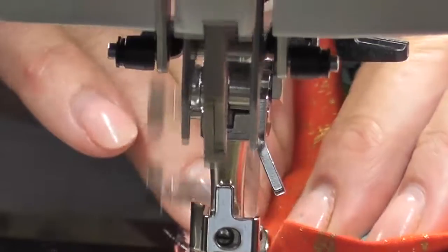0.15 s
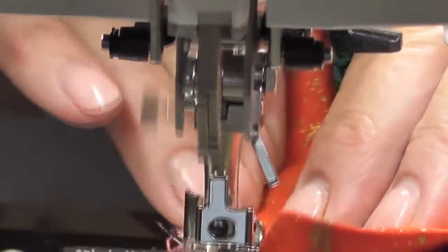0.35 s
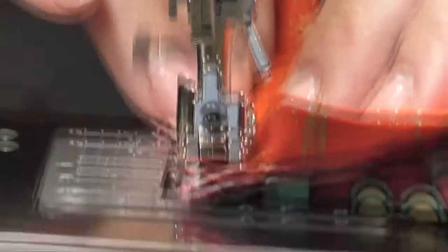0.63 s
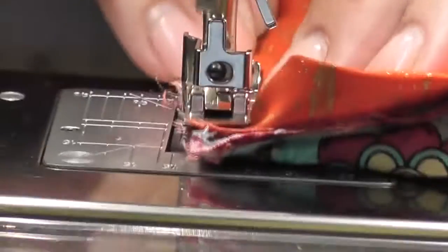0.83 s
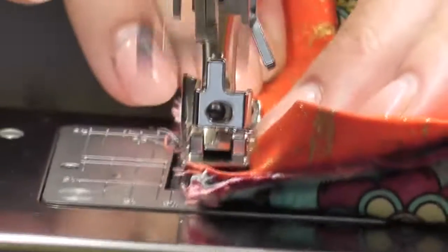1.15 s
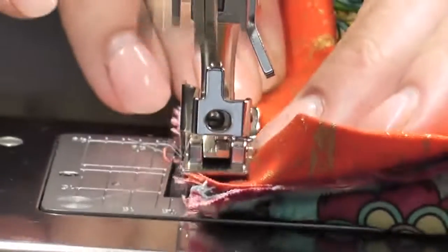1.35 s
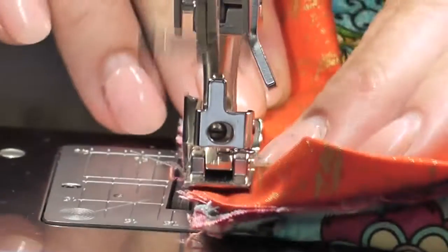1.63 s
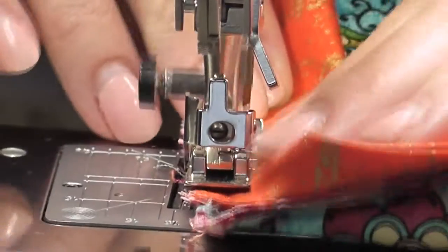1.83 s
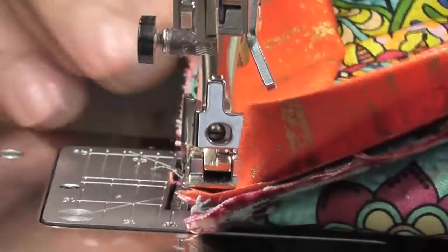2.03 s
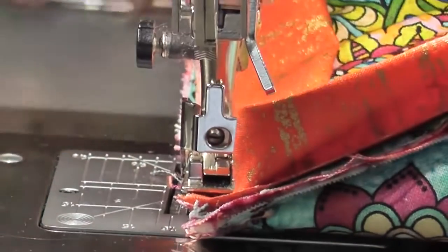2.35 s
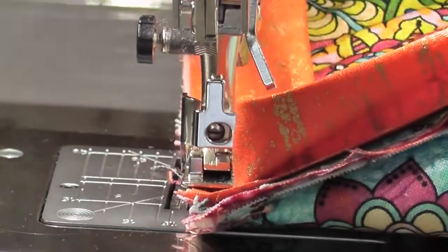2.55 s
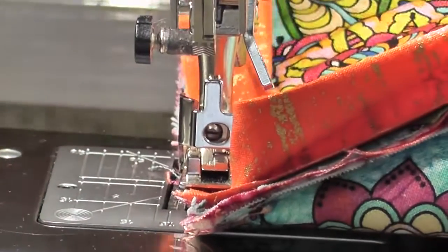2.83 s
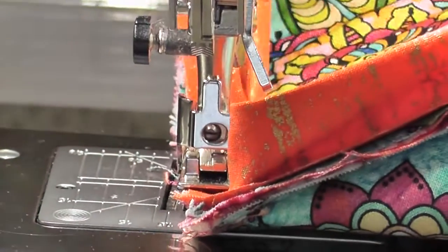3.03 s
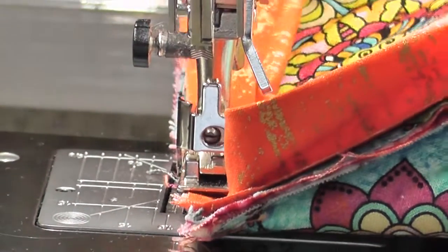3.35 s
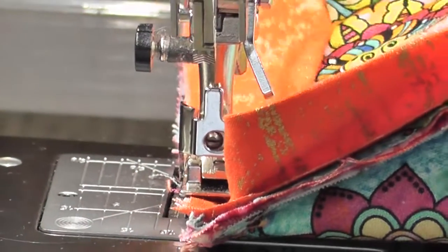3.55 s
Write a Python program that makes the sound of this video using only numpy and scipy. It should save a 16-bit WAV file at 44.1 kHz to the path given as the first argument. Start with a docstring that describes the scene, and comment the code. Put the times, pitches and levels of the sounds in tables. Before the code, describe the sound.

Close stereo microphones in a small quiet room catch a sewing machine's rattling whir and quick stitching clatter, cut off by a thump, then soft cloth rubbing, tiny metal clicks and faint hum.

```python
"""A quiet room at home: a sewing machine close to the microphones runs seven stitches a second,
then slows and dies away. Tooth contacts and loose rattle ring the casing, needle bar, hook and feed
dogs clack as gritty bursts. Knocks and ticks ring modes of bed and small steel parts; cloth rubs as
coloured noise and whistles as a narrow gliding band. A hum, faint rumble and air noise lie below."""
import sys
import numpy as np
from scipy import signal
from scipy.fft import rfft, irfft, next_fast_len
from scipy.io import wavfile
from scipy.ndimage import uniform_filter1d, map_coordinates

SR = 44100
rng = np.random.default_rng(int(sys.argv[2]) if len(sys.argv) > 2 else 0)


def wrap_up_sound(samples):
    """Save the sound to the file named by the first command line argument, as 16-bit audio."""
    columns = np.atleast_2d(samples).T
    # keep every value between -1 and 1, then stretch to whole-number steps
    tamed = np.clip(columns, -1, 1)
    steps = np.round(tamed * 32767).astype(np.int16)
    wavfile.write(sys.argv[1], SR, steps)


def gain_from_decibels(decibels):
    """Convert decibel values to linear amplitude factors."""
    exponent = np.asarray(decibels, float) / 20
    return 10 ** exponent


N = 163170
LEFT_RIGHT = np.array([[1], [-1]])


def unit(x):
    """Scales x to rms 1."""
    return x / np.sqrt(np.mean(x ** 2) + 1e-20)


def along(points, hz):
    """Interpolates (Hz, value) points on a log frequency axis."""
    f, v = np.transpose(points)
    return np.interp(np.log(hz + 1), np.log(f + 1), v)


def curves(rows):
    """One value per sample for each column after the time."""
    s, *cols = np.transpose(rows)
    return [np.interp(np.arange(N) / SR, s, c) for c in cols]


def wobble(rate_hz):
    """A smooth random curve, rate_hz knots a second."""
    knots = rng.standard_normal(int(N * rate_hz / SR) + 4)
    return map_coordinates(knots, [np.arange(N) * rate_hz / SR])


def filtered(x, response, causal=False):
    """x times a response of frequency; causal gives a gain its minimum phase."""
    m = next_fast_len(N + SR // 2) // 2 * 2
    h = response(np.fft.rfftfreq(m, 1 / SR))
    if causal:
        # fold the cepstrum onto positive time
        cepstrum = irfft(np.log(h + 1e-6), m)
        cepstrum[1:m // 2] *= 2
        cepstrum[m // 2 + 1:] = 0
        h = np.exp(rfft(cepstrum))
    return irfft(rfft(x, m) * h, m)[..., :N]


def coloured(x, spectrum):
    """x through a (Hz, dB) colour, rms 1."""
    return unit(filtered(x, lambda hz: gain_from_decibels(along(spectrum, hz)), causal=True))


def grains(per_s, scatter_db):
    """Random impulses of either sign and uneven size."""
    present = rng.random(N) < per_s / SR
    return present * rng.choice([-1, 1], N) * gain_from_decibels(scatter_db * rng.standard_normal(N))


def patchy(x, depth_db):
    """x with small random patches of gain in time and frequency."""
    z = signal.stft(x, nperseg=256)[2]
    field = uniform_filter1d(rng.standard_normal(z.shape), size=12, axis=0)
    field = uniform_filter1d(field, size=4, axis=1)
    return signal.istft(z * gain_from_decibels(depth_db * unit(field)), nperseg=256)[1][:N]


def dying(times_s, levels_db, t60_s, rise_s=0.0054):
    """Sum of envelopes that rise fast at the given times and die away."""
    t = np.arange(SR // 2) / SR
    blows = np.bincount((np.asarray(times_s) * SR).astype(int), gain_from_decibels(levels_db), N)
    return signal.fftconvolve(blows, gain_from_decibels(-60 * t / t60_s) * (1 - np.exp(-t / rise_s)))[:N]


def nearness(hz, centre_hz, octaves):
    """Gaussian weight around a centre on an octave axis."""
    return np.exp(-.5 * (np.log2((hz + 1) / centre_hz) / octaves) ** 2)


def drive():
    """Tooth contacts and loose rattle ring the casing; the load swings once and twice a turn."""
    # motor effort: start_s, effort_db
    effort = [(0.0, -33.5), (0.42, -33), (0.48, -35.5), (0.71, -33), (1.21, -33.5), (1.83, -33),
              (1.85, -46.5), (1.87, -38), (1.9, -47.5), (2.02, -52), (2.06, -44), (2.2, -90)]
    # casing response: frequency_hz, level_db
    casing = [(65, -59.5), (110, -24), (150, -14), (200, -10), (250, -8), (323, -12.5), (499, -6.5),
              (694, -10), (1070, -8.5), (1400, -18), (2170, -21), (2510, -22.5), (3640, -22.5),
              (4660, -29.5), (9240, -35.5), (15500, -43.5)]
    # casing resonances and dips: centre_hz, width_hz, gain_db
    casing_peaks = [(354.3, 14, 5.5), (375, 17, 6.5), (463, 23, 6.5), (517, 38, 3), (613, 29, 6),
                    (752, 14, 6), (1090, 31, 3), (1280, 110, 4.3), (1564, 72, 11), (2112, 134, 7.5),
                    (2510, 53, -29), (6323, 100, 11), (7820, 50, 7)]
    # gear tone: multiple of the tooth rate, level_db
    tone_orders = [(1, 2), (2, -10.5), (3, -8.5), (4, -17.5)]
    shaft_hz, first_load_peak_s, teeth_per_turn = 7.0, .135, 35.7
    power_cut_s, slowing_per_s = 1.84, 1.3  # slowing: share of full speed
    jitter_teeth, tooth_scatter_db = .11, 2
    rattle_per_s, rattle_scatter_db = 850, 1.5
    rattle_swing_db, rattle_lag_turns = 1, 0.31
    load_once_db, load_twice_db, load_twice_lag_turns = 1.5, 6, 0.061
    teeth_db, rattle_db, tone_db = -6.5, -1, -8

    effort_db, = curves(effort)
    t = np.arange(N) / SR
    lost_s = slowing_per_s / 2 * np.clip(t - power_cut_s, 0, .4) ** 2
    turn = (t - first_load_peak_s - lost_s) * shaft_hz
    tooth = teeth_per_turn * turn + .13 * wobble(8) + .04 * wobble(45)

    contact = np.flatnonzero(np.diff(np.floor(tooth)) > 0)
    draw = rng.standard_normal((len(contact), 2))
    jitter = draw[:, 0] * jitter_teeth * SR / (teeth_per_turn * shaft_hz)
    at = np.clip(contact + jitter, 0, N - 1).astype(int)
    teeth = np.bincount(at, gain_from_decibels(tooth_scatter_db * draw[:, 1]), N)
    rattle = grains(rattle_per_s, rattle_scatter_db)
    excite = gain_from_decibels(teeth_db) * unit(teeth - teeth.mean()) + gain_from_decibels(rattle_db) * unit(rattle)
    swing_db = rattle_swing_db * np.cos(4 * np.pi * (turn - rattle_lag_turns)) + 0.53 * wobble(30.26)

    def casing_gain(hz):
        peaks_db = sum(db / (1 + (2 * (hz - c) / w) ** 2) for c, w, db in casing_peaks)
        return gain_from_decibels(along(casing, hz) + peaks_db)

    rung = filtered(excite * gain_from_decibels(swing_db), casing_gain, causal=True)
    buzz = unit(patchy(rung, depth_db=1.5))

    load_db = load_once_db * np.cos(2 * np.pi * turn)
    load_db += load_twice_db * np.cos(4 * np.pi * (turn - load_twice_lag_turns))
    coast_db = -60 * np.clip(t - power_cut_s, 0, 1)
    partials = sum(gain_from_decibels(db) * np.sin(2 * np.pi * k * tooth + k) for k, db in tone_orders)
    tone = gain_from_decibels(tone_db) * unit(gain_from_decibels(load_db + 2.4 * wobble(22.06) + coast_db) * partials)
    end_db = -200 * np.clip(t - effort[-1][0], 0, 1)
    return gain_from_decibels(effort_db + end_db) * (buzz + tone)


def hum():
    """A transformer's steady tone, stronger on the right."""
    hum_hz, hum_db, pan_db = 100.1, -57.5, -4.5
    tone = np.sqrt(2) * np.sin(2 * np.pi * hum_hz * np.arange(N) / SR)
    return tone * gain_from_decibels(hum_db + 0.43 * wobble(7.5) + LEFT_RIGHT * pan_db / 2)


def rumble():
    """Faint low noise, independent in each channel."""
    spectrum = [(25, -26), (52, -10), (75, -11), (120, -44)]  # Hz, dB
    return gain_from_decibels(-72.5) * coloured(rng.standard_normal((2, N)), spectrum)


def air_noise():
    """Two independent layers of coloured room noise."""
    # frequency_hz, level_db
    air_spectrum = [(76, -30), (130, -12.5), (194, -15.5), (327, -11.5), (391, -20), (1270, -23.5),
                    (1620, -29.5), (4500, -35.5), (5490, -33), (6200, -36.5), (15600, -46)]
    return gain_from_decibels(-61) * np.array([coloured(rng.standard_normal(N), air_spectrum) for _ in range(2)])


def room(x):
    """Decaying noise as a reverberant tail, unrelated on each call."""
    t = np.arange(SR // 2) / SR
    t60_s = 0.24
    tail = rng.standard_normal(len(t)) * gain_from_decibels(-60 * t / t60_s)
    return signal.fftconvolve(x, tail / np.linalg.norm(tail))[:N]


def clacks():
    """Needle bar, hook and feed dogs: short gritty bursts in the steel, a duller part in the casing."""
    # start_s, level_db (before trim_db), body_db over the bright part
    strikes = [(0.029, -27.5, 3), (0.0583, -29, -2), (0.102, -28, 6.5), (0.1755, -31, 4.5),
               (0.234, -37, 12), (0.2818, -38, -5), (0.349, -40, 5), (0.38, -36.5, -7), (0.414, -35, 2),
               (0.463, -28.5, 6), (0.52, -34, 9), (0.5437, -39, 11), (0.605, -37, -4), (0.6589, -35, 2),
               (0.6765, -26, 1.5), (0.707, -35, -6), (0.748, -29, 5.5), (0.812, -32, 6), (0.8455, -39, -14),
               (0.892, -30, 6), (0.9566, -28, 6), (1.0291, -32, 2), (1.0909, -37, 8), (1.1053, -27, 0),
               (1.167, -33.5, 9), (1.235, -33.5, 8), (1.319, -33, 8), (1.3428, -33, 3), (1.39, -26, 4),
               (1.4566, -30.5, 8.5), (1.531, -25.5, 3), (1.5638, -32, -4), (1.6043, -32.5, 8.5),
               (1.675, -27.5, 5.5), (1.7345, -32.5, 7), (1.765, -32.5, 4.5), (1.848, -32, 4),
               (1.929, -39, -12)]
    # steel colour: frequency_hz, level_db
    steel = [(1470, -29), (2500, -23), (3000, -11.5), (3650, -3), (4250, -5), (4900, -9), (6490, -10.5),
             (10200, -12.5), (11300, -12), (15500, -24.5)]
    body_spectrum = [(400, -45.5), (1050, 8.5), (2000, -2.5), (4000, -7.5), (6000, -42)]  # Hz, dB
    trim_db, grit_db, bright_t60_s, body_t60_s = -8, 0.7, 0.11, 0.14

    def grit():
        return patchy(rng.standard_normal(N), depth_db=3.5) * gain_from_decibels(grit_db * wobble(500))

    s, db, body_db = np.transpose(strikes)
    bright = coloured(grit(), steel) * dying(s, db + trim_db, bright_t60_s)
    body = coloured(grit(), body_spectrum) * dying(s, db + body_db + trim_db, body_t60_s)
    return bright + body


def knocks():
    """The shaft's last stop, levers and fingers on the bed: a puff plus bed modes near each centre."""
    # start_s, level_db (before trim_db), centre_hz, spread_octaves, t60_s
    blows = [(1.861, -23.5, 990, 0.19, 0.11), (1.862, -18, 316, 0.33, 0.098),
             (1.868, -23.5, 550, 0.12, 0.09), (1.885, -30, 284, .4, .13), (1.948, -35.5, 300, 0.38, 0.18),
             (1.985, -41, 546, 0.16, 0.26), (2.006, -37, 1040, 0.34, 0.085), (2.025, -38, 267, 0.29, 0.28),
             (2.292, -35, 1020, 0.41, 0.064), (2.305, -32, 840, 0.38, 0.07),
             (2.321, -35.5, 750, 0.46, 0.049), (2.336, -42.5, 800, 0.47, 0.076),
             (2.394, -41, 250, 0.86, 0.28), (2.436, -43, 1930, 0.6, 0.095), (2.521, -32, 620, 1.08, 0.28),
             (2.612, -38.5, 900, 1.5, 0.19), (2.833, -47, 585, 1.2, .2), (2.958, -43.5, 1110, 1.3, 0.24),
             (3.053, -36, 1900, 1.26, 0.15), (3.236, -29.5, 1190, 1.7, 0.014)]
    # bed modes: frequency_hz, t60_s
    bed = [(300, 0.22), (550, .2), (600, 0.72), (700, 0.2), (860, 0.14), (1030, 0.047), (1249, 0.53),
           (1658, 0.13), (2078, 0.029), (2654, 0.12), (3500, .1), (4086, .1), (5350, 0.11)]
    trim_db, rise_s, ring_db = -7, 0.0017, 3
    out, t = np.zeros(N + SR), np.arange(SR // 3) / SR
    f = np.fft.rfftfreq(len(t), 1 / SR)
    for s, db, centre_hz, octaves, t60_s in blows:
        noise = rfft(rng.standard_normal(len(t)))
        puff = unit(irfft(noise * nearness(f, centre_hz, octaves) / np.sqrt(f + 1), len(t)))
        weights = [nearness(hz, centre_hz, octaves) for hz, _ in bed]
        ring = np.zeros(len(t))
        for weight, (hz, mode_t60_s) in zip(weights, bed):
            ring += weight * gain_from_decibels(rng.normal(0, 3.1) - 60 * t / mode_t60_s) * np.sin(2 * np.pi * hz * t)
        ring /= np.linalg.norm(weights)
        shape = gain_from_decibels(db + trim_db - 60 * t / t60_s) * (1 - np.exp(-t / rise_s))
        out[round(s * SR):][:len(t)] += shape * (puff + gain_from_decibels(ring_db) * ring)
    return out[:N]


def cloth():
    """Fabric on the bed: grains of the weave, a duller rub of folds, a bright scrape on the plate."""
    # time_s, stroke_db, then folds_db and scrape_db over the stroke (before trims)
    strokes = [(1.9, -76, 18, -19), (1.93, -53.5, 12, -7), (1.985, -73, 15, -7), (2.0, -54, 8.5, -6),
               (2.064, -59.5, 14.5, -4.5), (2.14, -61, 5, -3), (2.21, -62.5, -1, -9.5), (2.28, -60, 3, -7),
               (2.32, -69, 4, -6), (2.42, -65, 13, -7), (2.44, -62.5, 4, -6), (2.47, -61, -1, -6),
               (2.5, -59, 3, -8), (2.526, -46, 7, -14), (2.586, -54, 5, -10), (2.616, -45.5, 4, -11),
               (2.68, -61.5, 10, -13), (2.756, -69, 10, -6), (2.82, -62, 8, -2), (2.862, -60.5, 6, -1),
               (2.93, -70, 6.5, -8), (2.962, -56.5, 4.5, -5.5), (3.042, -59.5, 4.5, -8),
               (3.058, -52.5, -4, -11), (3.08, -59, 9, -4), (3.22, -56.5, 3, -6), (3.3, -51, 1.5, -21),
               (3.4, -53.5, 1.5, -28), (3.5, -61.5, 4, -7), (3.55, -63.5, -4, -10), (3.7, -77, -6, -10)]
    # colours of the three parts: frequency_hz, level_db
    weave_spectrum = [(880, -19), (1500, -1), (2220, -2.5), (2600, -6), (3200, -3), (3990, -6.5),
                      (6890, -17.5), (11600, -19), (15500, -27)]
    folds_spectrum = [(88, -42.5), (150, -6), (319, -14), (423, -4.5), (919, -11.5), (998, -9.5),
                      (2200, -21), (2500, -46), (3250, -45), (5500, -120)]
    scrape_spectrum = [(2500, -28), (4500, -4), (5300, -1), (6200, 0.5), (10000, -6), (15500, -24)]
    folds_trim_db, scrape_trim_db = -3.0, 1.0

    def rub():
        return patchy(rng.standard_normal(N) + 0.77 * unit(grains(1500, 4.0)), depth_db=1.7)

    stroke_db, folds_db, scrape_db = curves(strokes)
    moving = np.arange(N) / SR > strokes[0][0]
    weave = coloured(rub(), weave_spectrum) * gain_from_decibels(1.3 * wobble(36))
    folds = coloured(rub(), folds_spectrum) * gain_from_decibels(folds_db + folds_trim_db + 0.31 * wobble(29.14))
    scrape = coloured(rub(), scrape_spectrum) * gain_from_decibels(scrape_db + scrape_trim_db)
    return moving * gain_from_decibels(stroke_db) * (weave + folds + scrape)


def ticks():
    """Small steel parts settling: a crack and the short modes near each centre."""
    # start_s, level_db (before trim_db), centre_hz, spread_octaves
    clicks = [(1.928, -37, 6800, 0.46), (1.928, -35, 2800, 0.31), (1.997, -30.5, 3220, 0.61),
              (2.115, -47.5, 5800, .3), (2.366, -34, 3180, .25), (2.383, -45, 3500, .25),
              (2.441, -41, 5000, 0.32), (3.054, -32, 3520, .5)]
    # steel part modes: frequency_hz, t60_s
    lever = [(2270, .05), (3400, .045), (3650, .02), (4800, .04), (5400, .03), (6400, .04)]
    trim_db, rise_s, crack_db, crack_t60_s = -12.0, 0.0012, -3, .03
    out, t = np.zeros(N + SR), np.arange(SR // 5) / SR
    f = np.fft.rfftfreq(len(t), 1 / SR)
    for s, db, centre_hz, octaves in clicks:
        ring = np.zeros(len(t))
        for hz, t60_s in lever:
            envelope = gain_from_decibels(rng.normal(0, 1.0) - 60 * t / t60_s)
            mode = np.sin(2 * np.pi * hz * t + 6 * rng.random())
            ring += nearness(hz, centre_hz, octaves) * envelope * mode
        noise = rfft(rng.standard_normal(len(t))) * nearness(f, centre_hz, octaves)
        crack = gain_from_decibels(crack_db - 60 * t / crack_t60_s) * unit(irfft(noise, len(t)))
        out[round(s * SR):][:len(t)] += gain_from_decibels(db + trim_db) * (ring + crack) * (1 - np.exp(-t / rise_s))
    return out[:N]


def whistle():
    """Cloth sliding on the steel plate: a thin band of noise around a gliding pitch."""
    # time_s, pitch_hz, level_db
    glide = [(2.43, 4930, -85), (2.45, 5000, -62), (2.48, 5170, -64), (2.51, 5770, -59), (2.56, 5300, -62),
             (2.7, 5440, -68), (2.78, 5330, -85), (3.22, 3190, -85), (3.27, 3220, -62.5), (3.4, 3210, -64),
             (3.47, 3170, -85)]
    pitch_hz, level_db = curves(glide)
    carrier = np.sin(2 * np.pi * np.cumsum(pitch_hz) / SR)
    return gain_from_decibels(level_db + 4.3 * wobble(42)) * unit(wobble(800) * carrier)


def ports(x):
    """Two close microphone ports: level and phase between left and right vary with frequency."""
    # frequency_hz, left_over_right_db
    balance = [(60, -7), (110, -2), (200, 0.5), (380, 0.5), (700, 0), (1290, 4), (2380, 1), (4400, -0.5),
               (8120, -1), (15000, 3.5)]
    # frequency_hz, left_lead_rad
    lead = [(0, 0.35), (260, -0.22), (3190, -0.01), (11700, 0.25), (12900, -0.1), (13500, -0.7),
            (15200, -0.1)]

    def response(hz):
        gain = gain_from_decibels(LEFT_RIGHT * along(balance, hz) / 2)
        return gain * np.exp(.5j * LEFT_RIGHT * along(lead, hz))

    return filtered(x, response)


def walls(x):
    """Colours the side signal, opposite in the two channels."""
    # frequency_hz, gain_db
    wall_spectrum = [(100, -8), (500, -10), (1500, -10), (3000, -11.5), (5000, -24.5), (9000, -31),
                     (13000, -5)]
    return LEFT_RIGHT * filtered(x, lambda hz: gain_from_decibels(along(wall_spectrum, hz)))


def scene():
    """All sources at the two ports; tail and air noise also differ between them."""
    room_db, air_side_db = -7, 11.5
    near = drive() + clacks() + knocks() + cloth() + ticks() + whistle()
    air = air_noise()
    mid = near + gain_from_decibels(room_db) * room(near) + air[0]
    side = room(near) + gain_from_decibels(air_side_db) * air[1]
    return ports(mid) + walls(side) + hum() + rumble()


def roll_off(x):
    """The treble ends steeply here."""
    return signal.sosfilt(signal.butter(12, 15710, fs=SR, output="sos"), x)


def record(dry):
    """The camera cuts the lowest bass, below about 25 Hz."""
    finished = filtered(dry, lambda hz: hz ** 2 / (hz ** 2 + 25 ** 2))
    return roll_off(finished)


dry = scene()
out = record(dry)
wrap_up_sound(out)
```